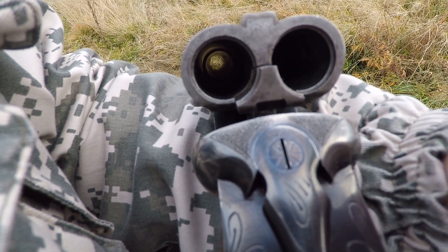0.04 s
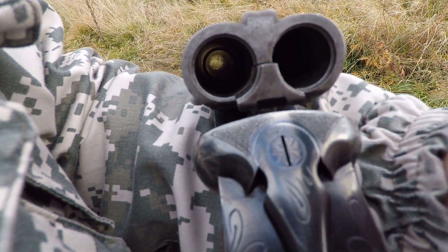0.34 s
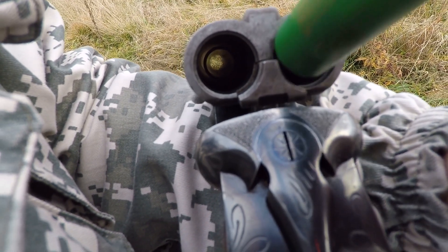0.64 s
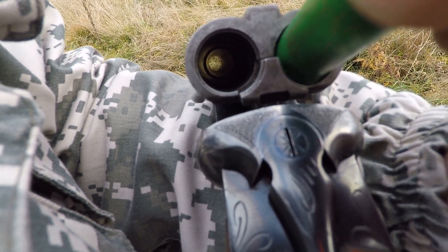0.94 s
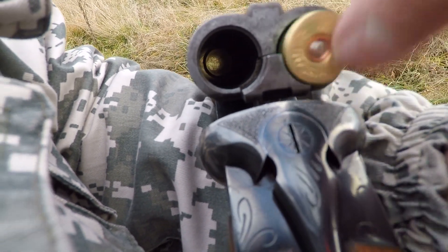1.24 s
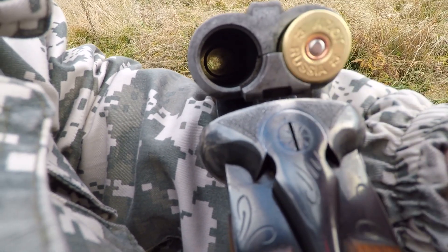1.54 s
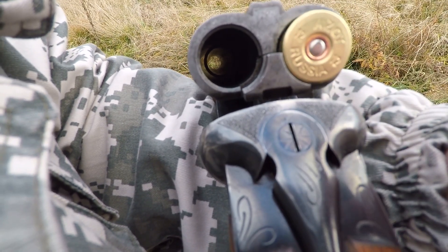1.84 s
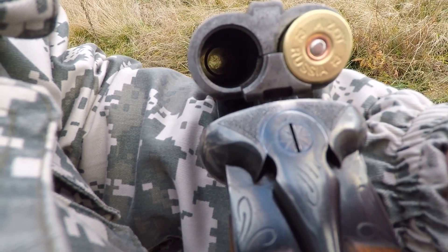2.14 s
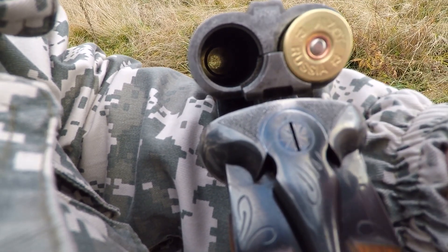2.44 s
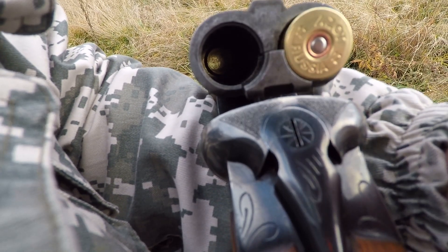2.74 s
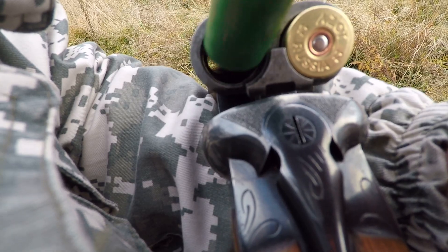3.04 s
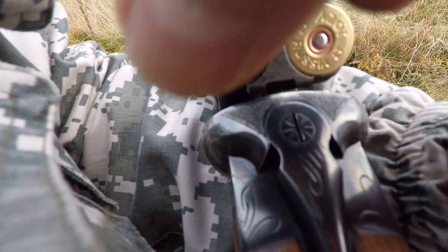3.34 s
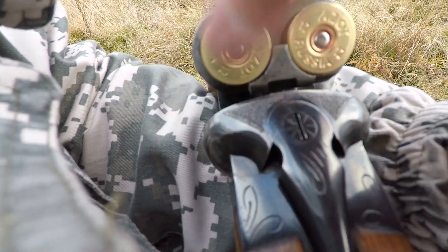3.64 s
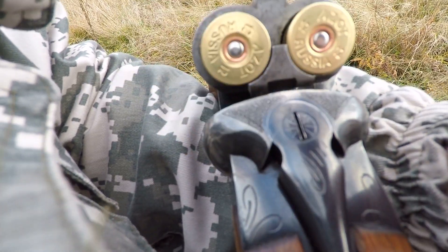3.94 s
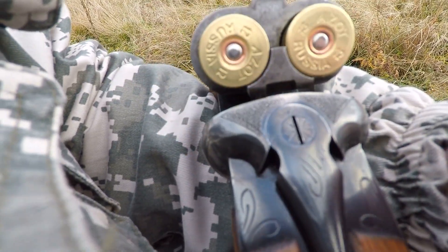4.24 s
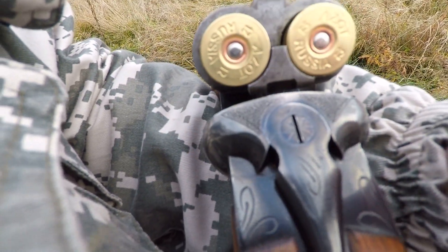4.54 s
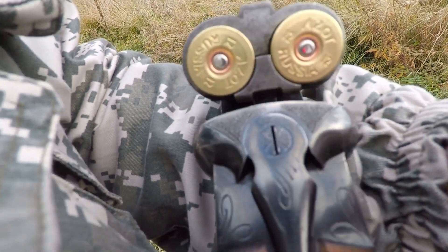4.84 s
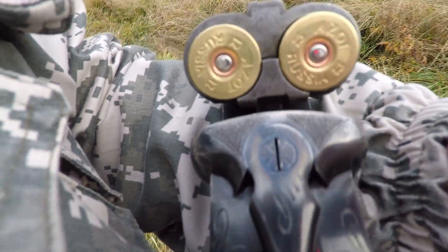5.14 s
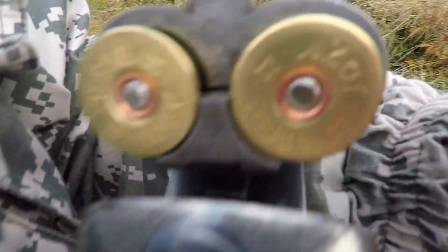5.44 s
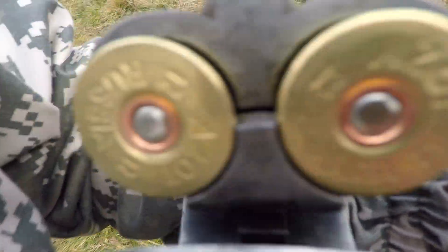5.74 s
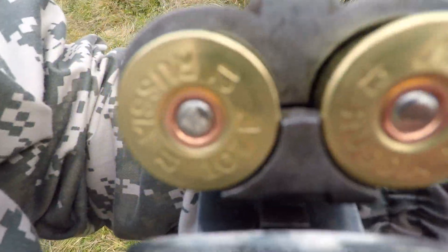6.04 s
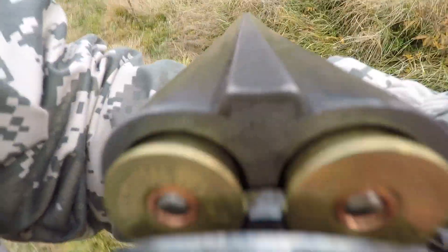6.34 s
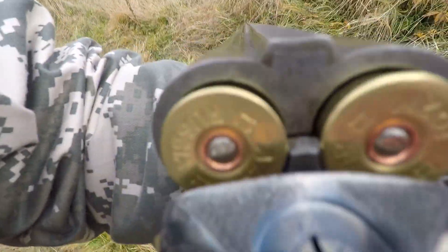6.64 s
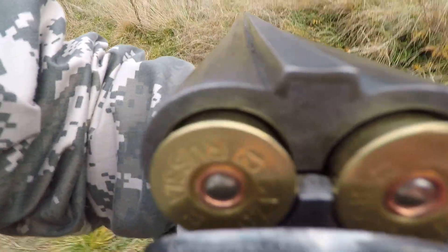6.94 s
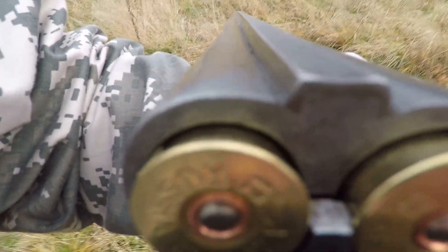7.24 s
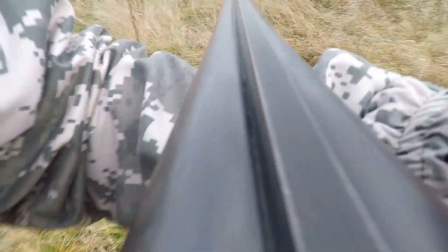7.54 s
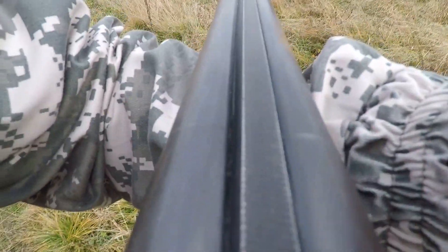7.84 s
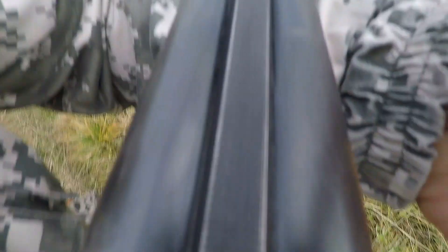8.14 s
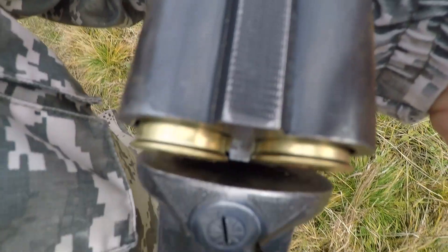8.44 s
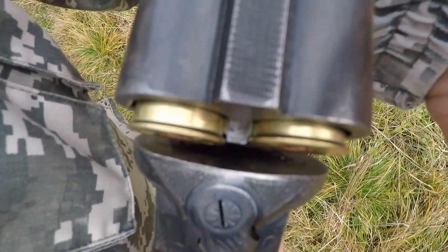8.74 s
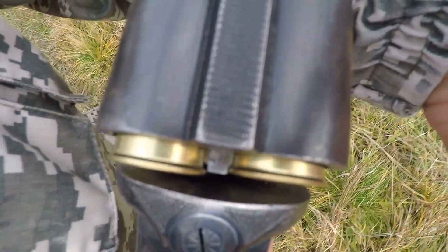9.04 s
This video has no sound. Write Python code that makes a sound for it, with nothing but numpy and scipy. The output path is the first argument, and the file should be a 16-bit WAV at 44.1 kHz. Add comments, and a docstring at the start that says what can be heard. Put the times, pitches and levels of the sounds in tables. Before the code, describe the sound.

Close up, a shotgun is loaded with two sliding shells, each clicking home, then shifted with soft thumps, ticks and cloth rustle.

```python
"""A quiet meadow, where two cartridges slide into a side-by-side shotgun, very close up.
Each plastic hull bumps and scrapes along its chamber until the brass rim snaps home and the barrels
ring. Between the two, the second cartridge is tugged from a rustling pocket. Then the gun shifts on
the lap: sleeves swish, fittings tick, and handling gives dull knocks and low thumps."""
import sys
import numpy as np
from scipy import signal
from scipy.fft import rfft, irfft
from scipy.io import wavfile

SR = 44100
rng = np.random.default_rng(int(sys.argv[2]) if len(sys.argv) > 2 else 0)


def output_pcm(signal):
    """Save a mono or channel-first signal as 16-bit PCM at the path in sys.argv[1].

    Samples are clipped to [-1, 1] before scaling.
    """
    pcm = np.clip(np.atleast_2d(signal).T, -1, 1) * 32767
    wavfile.write(sys.argv[1], SR, np.round(pcm).astype(np.int16))


N = 405719
TIME = np.arange(N) / SR

# The dead thud of a filled hull. Each row: frequency in Hz, relative level in dB.
HULL_THUD = [(50, -6), (130, -2), (280, -4), (420, 1), (750, -6.5), (1100, -16), (2500, -35.5)]


def from_db(db):
    """Decibels to gain."""
    return 10 ** (np.asarray(db) / 20)


def rms_one(x):
    """Scale to unit power."""
    return x / np.sqrt(np.mean(x ** 2) + 1e-20)


def add(track, s, sound):
    """Mix a short sound in at s seconds."""
    start = int(round(s * SR))
    track[start:start + len(sound)] += sound[:N - start]


def response(spectrum, size=4096):
    """Minimum-phase impulse response of an EQ curve; unit energy."""
    hz, db = np.transpose(spectrum)
    grid = np.maximum(np.fft.rfftfreq(size, 1 / SR), 1)
    gain = from_db(np.interp(np.log(grid), np.log(hz), db))
    cepstrum = irfft(np.log(gain))
    cepstrum[1:size // 2] *= 2
    cepstrum[size // 2 + 1:] = 0
    pulse = irfft(np.exp(rfft(cepstrum)))
    return pulse / np.linalg.norm(pulse)


def colour(x, spectrum):
    """Shape a sound with an EQ curve."""
    return signal.oaconvolve(x, response(spectrum))[:N]


def band(x, low_hz, high_hz):
    """Keep one band."""
    edges = [low_hz, min(high_hz, SR / 2 - 1000)]
    return signal.sosfilt(signal.butter(2, edges, "band", fs=SR, output="sos"), x)


def soften(x, hz):
    """A softer contact loses its treble."""
    return signal.sosfilt(signal.butter(2, min(hz, SR / 2 - 1000), fs=SR, output="sos"), x)


def ring(force, hz, t60):
    """One resonance: a unit click sets off a sine that falls 60 dB in t60 seconds."""
    r = np.exp(-np.log(1000) / (t60 * SR))
    w = 2 * np.pi * hz / SR
    return signal.lfilter([0, np.sin(w)], [1, -2 * r * np.cos(w), r * r], force + 1e-18)


def surge(spread_db, per_s):
    """A gain that wanders by chance."""
    knots = rng.standard_normal(2048)
    return from_db(spread_db * np.interp(TIME * per_s, np.arange(len(knots)), knots))


def stroke(middle_s, half_s, db, steepness=2.8):
    """Envelope of one sliding movement: it gathers speed, holds and comes to rest."""
    return from_db(db) / (1 + np.abs((TIME - middle_s) / half_s) ** steepness)


def friction(spread_db):
    """Countless tiny slips of uneven size; rms 1."""
    noise = rng.standard_normal(N)
    grains = np.repeat(rng.standard_normal(N // 32 + 1), 32)[:N]
    return rms_one(noise * from_db(spread_db * grains))


def chatter(decay, size=2048):
    """A dying flurry of tiny contacts that excites all pitches about alike; unit energy."""
    t = TIME[:size]
    spectrum = rfft(rng.standard_normal(size) * np.exp(-t / decay))
    flat = irfft(spectrum / (np.abs(spectrum) + 1e-12))
    flurry = flat / (1 + (t / (np.pi * decay)) ** 2) ** 2
    return flurry / np.linalg.norm(flurry)


def air(level_db=-63):
    """Open air lays a faint, steady bed of noise."""
    # The meadow's tone. Each row: frequency in Hz, relative level in dB.
    air_eq = [(15, -28.5), (25, 2), (160, -16.5), (274, -13.5), (340, -16.5), (567, -18), (614, -21.5),
              (684, -18.5), (782, -21), (2630, -23), (15500, -35.5)]
    return from_db(level_db) * colour(rng.standard_normal(N), air_eq)


def hands(trim_db=2, judder_hz=144):
    """The hands rumble on the gun and once judder along the stock."""
    # The swell of the grip. Each row: time in seconds, relative level in dB.
    grip = [(0.0, -62.5), (0.56, -64), (1.25, -53.5), (1.64, -59.5), (2.56, -65), (3.3, -55), (4.25, -62.5),
            (5.28, -55), (5.84, -62), (6.43, -52), (7.25, -59.5), (7.61, -52), (8.79, -67), (9.2, -58.5)]
    # Its deep rumble. Each row: frequency in Hz, relative level in dB.
    rumble_eq = [(15, -4.5), (35, -0.5), (60, -5), (100, -15), (200, -22), (400, -33), (1000, -56.5)]
    swell = from_db(trim_db + np.interp(TIME, *np.transpose(grip)))
    rumble = swell * colour(rng.standard_normal(N), rumble_eq)
    judder = rms_one(ring(rng.standard_normal(N), judder_hz, t60=0.13))
    return rumble + stroke(middle_s=5.415, half_s=0.035, db=-45.5) * judder


def scrapes(bite_s=0.008, fall_db=-4, coupling_db=-27, thud_db=-3):
    """The ribbed hull bites, hisses in jerks on the chamber wall, thuds and softly drives the barrels."""
    # Bumps that ease into slides. Each row: start and length in seconds, then relative hiss,
    # body and extra bite of the first touch in dB.
    slides = [(.731, 0.021, -61.5, -52, 0), (0.787, 0.042, -54, -50.5, 8), (0.888, 0.02, -51.5, -44, 4),
              (1.182, .05, -65, -55.5, 9), (1.2449, .062, -43, -42, 3), (1.356, .016, -55, -45, 0),
              (2.8732, 0.026, -44, -45.5, 8.5), (3.067, .05, -47, -47.5, -0.5),
              (3.162, 0.045, -51, -51.5, -2.5), (3.226, .02, -48.5, -45.5, 0.5),
              (3.395, 0.019, -61.5, -54, 1), (3.579, 0.058, -52, -54, 4.5),
              (3.598, 0.0091, -44.5, -45, 1.5), (3.644, 0.046, -45.5, -44, -5.5),
              (3.706, 0.021, -42, -45.5, 2.5)]
    # Plastic rubbing on steel. Each row: frequency in Hz, relative level in dB.
    plastic_eq = [(300, -9), (1200, -5.5), (2000, -9.5), (2800, -9), (4000, -3), (4700, -7.5), (7000, 2.5),
                  (8600, -9), (10000, -4.5), (12000, -10.5), (15000, -14)]
    envelope, force = np.zeros((2, N))
    for s, length, hiss_db, body_db, bite_db in slides:
        t = TIME[:int(2 * length * SR)]
        pressure = from_db(fall_db * t / length + bite_db * np.exp(-t / bite_s))
        pressure /= 1 + (t / length) ** 10  # the hull lets go
        add(envelope, s, from_db(hiss_db) * pressure)
        bump = chatter(length / 2 / from_db(bite_db), size=8192)
        add(force, s, from_db(body_db) * np.linalg.norm(pressure) * bump)
    jerks = rms_one(surge(spread_db=4, per_s=240))
    steel = from_db(coupling_db) * barrels(soften(force, hz=800), uneven_db=2.5)
    hiss = colour(envelope * jerks * friction(spread_db=5.5), plastic_eq)
    thud = from_db(thud_db) * colour(force, HULL_THUD)
    return hiss + thud + steel


def barrels(force, uneven_db=3.5):
    """Every mode of the steel answers the same force, a little differently from touch to touch."""
    # Modes of barrels and action. Each row: pitch in Hz, relative level in dB, t60 in seconds.
    modes = [(126, -9.5, 0.3), (197, -9, 0.46), (243.6, -5.5, 0.16), (312, -8, .16), (367, -3, 0.19),
             (457.2, -11.5, 0.26), (495.7, -11, 0.15), (657, -9.5, 0.11), (907, -10, .06),
             (1180, 1.5, 0.062), (1190, -6, 0.1), (1289, -6, 0.092), (1340, -8.5, .1), (1540, -11.5, .08),
             (1980, -3.5, 0.05), (2201, -6, 0.055), (5300, -16, .05), (6000, -17.5, .05), (6760, -18, .05),
             (7252, -18, .05), (7900, -15.5, .05)]
    return sum((-1) ** k * ring(force * from_db(db) * surge(uneven_db, per_s=1.7), hz, t60)
               for k, (hz, db, t60) in enumerate(modes))


def thumps(swings=7.2):
    """The whole gun rocks in the hands, and the grip stops it within a few swings."""
    # Low rocking. Each row: start in seconds, level in dB, pitch in Hz.
    rocks = [(0.745, -34, 44), (0.893, -34, 54.3), (1.126, -40.5, 100), (1.325, -36.5, 62),
             (2.875, -28.5, 83), (3.071, -31, 71.6), (3.17, -38.5, 86), (3.239, -31.5, 41.87),
             (3.56, -35, 74), (3.605, -33, 69), (3.68, -30, 46.3), (4.79, -40.5, 48), (5.197, -37, 93.2),
             (5.41, -41, 36), (6.317, -36, 54.9), (6.37, -41, 42), (6.944, -37.5, 44.6),
             (7.266, -35.5, 54.8), (7.804, -33.5, 41.7), (8.18, -37, 65.1)]
    out, click = np.zeros(N), signal.unit_impulse(SR // 2)
    for s, db, hz in rocks:
        add(out, s, from_db(db) * ring(click, hz, t60=swings / hz))
    return out


def knocks(body_hz=190, body_db=-18, wood_hz=900, wood_db=-15):
    """Handling gives dead knocks, each with a short ring of body and wood at pitches of its own."""
    # The knocks. Each row: start in seconds, pulse peak in dB, treble cutoff in Hz.
    hits = [(0.7878, -37, 700), (.887, -34.5, 700), (2.8744, -22, 700), (3.0658, -32.5, 600),
            (3.196, -33, 899), (4.576, -41, 1397), (5.0165, -31, 903), (5.1532, -29.5, 1600),
            (5.1815, -23.5, 2200), (5.196, -26, 2200), (5.2171, -25.5, 2000), (5.2588, -24, 2220),
            (5.6189, -32, 1800), (6.216, -33.5, 2490), (6.2697, -34.5, 2480), (6.317, -33.5, 2530),
            (6.338, -39, 2000), (6.3917, -38.5, 1980), (6.466, -31.5, 2200), (6.7452, -29, 1996),
            (6.943, -27.5, 1500), (6.958, -26, 2220), (6.9884, -31, 2200), (7.1989, -31, 3470),
            (7.264, -24.5, 2200), (7.457, -39, 1200), (8.179, -41, 450)]
    # A knock's tone before softening. Each row: frequency in Hz, relative level in dB.
    knock_eq = [(30, -32), (100, 13.5), (200, 6), (400, 9), (800, 4), (1400, 3.5), (2100, -0.5),
                (2900, -11.5), (6000, -1.5), (15000, -2)]
    out, click = np.zeros(N), signal.unit_impulse(SR // 2)
    knock = response(knock_eq, size=len(click))
    detunes = 2 ** rng.uniform(-0.47, 0.34, (len(hits), 2))
    for (s, db, cutoff_hz), (body_detune, wood_detune) in zip(hits, detunes):
        pulse = soften(knock, cutoff_hz)
        body = from_db(body_db) * ring(click, body_hz * body_detune, t60=0.098)
        wood = from_db(wood_db) * ring(click, wood_hz * wood_detune, t60=0.025)
        add(out, s, from_db(db) * (body + wood - pulse / np.abs(pulse).max()))
    return out


def cloth():
    """Threads catch and slip in uneven surges; rms 1."""
    return rms_one(friction(spread_db=2) * surge(spread_db=2.5, per_s=63))


def sleeves(trim_db=-1, drag_hz=(550, 3700)):
    """Sleeves swish over cloth and rub on the gun; once a stiff fold drags across it."""
    # Arm movements. Each row: middle and half length in seconds, relative swish and rub in dB.
    moves = [(1.19, 0.084, -66.5, -62), (4.968, 0.21, -68, -56), (5.305, .13, -63.5, -58),
             (5.522, 0.11, -63, -64), (6.318, 0.066, -69.5, -65), (6.497, 0.063, -62, -61),
             (7.0, 0.3, -66.5, -65.5), (7.5, 0.071, -60.5, -59.5), (7.63, 0.041, -56, -55),
             (7.773, 0.1, -65.5, -63), (8.2, 0.12, -67, -72), (9.15, 0.096, -63.5, -64.5)]
    # Cloth on cloth, then cloth on the gun. Each row: frequency in Hz, relative level in dB.
    swish_eq = [(800, -15), (2200, -3.5), (4500, 3.5), (7000, -4.5), (10000, -13.5), (15000, -17)]
    rub_eq = [(100, 1.5), (250, -5.5), (600, -2), (1500, -5), (2300, -12.5), (4000, -19.5), (9000, -27)]
    swish = sum(stroke(s, half, db + trim_db) for s, half, db, _ in moves)
    rub = sum(stroke(s, half, db + trim_db) for s, half, _, db in moves)
    stiff_fold = rms_one(band(band(cloth(), *drag_hz), *drag_hz))
    drag = stroke(middle_s=6.312, half_s=0.012, db=-47) * stiff_fold
    return swish * colour(cloth(), swish_eq) + rub * colour(cloth(), rub_eq) + drag


def crack(decay, pitch_hz, q=4.3, broad_db=-7, size=2048):
    """One hard contact: a dense ring around its main pitch that dies within milliseconds."""
    # Brass on steel. Each row: frequency in Hz, relative level in dB.
    brass_eq = [(100, -8), (400, -2), (800, -6), (1600, -5.5), (2200, -2), (3700, -2), (4600, -3.5),
                (5600, -2.5), (6500, -7), (7600, -2.5), (10000, -9), (11500, -15.5), (15000, -21.5)]
    broad = signal.fftconvolve(chatter(decay), response(brass_eq))[:size]
    pitched = signal.lfilter(*signal.iirpeak(pitch_hz, q, fs=SR), broad)
    burst = from_db(broad_db) * broad + pitched
    return burst * np.sqrt(decay * SR / 2) / np.linalg.norm(burst)  # starts near unit rms


def ticks(decay_s=0.0007):
    """Small metal parts touch, too light to move the barrels or to sound far below their pitch."""
    # Cartridges and fittings. Each row: start in seconds, relative level in dB, main pitch in Hz.
    touches = [(1.184, -38, 2000), (1.251, -33, 1900), (1.38, -46.5, 13000), (1.429, -46.5, 5030),
               (1.522, -51, 6300), (1.7965, -44.5, 9300), (2.4529, -42.5, 11200), (2.554, -36.5, 10300),
               (2.607, -25.5, 9500), (3.0685, -45, 4000), (3.196, -33, 2120), (3.238, -36.5, 3900),
               (3.6, -36, 2080), (5.891, -38.5, 1697), (6.606, -42.5, 3230), (6.9422, -37.5, 4020),
               (6.948, -40.5, 2500), (6.968, -37, 4000), (7.254, -34, 2600), (7.458, -43, 2500),
               (7.6314, -33.5, 4850), (7.64, -36.5, 3530), (7.8065, -43, 3460), (8.285, -47.5, 6970),
               (9.137, -43, 4000)]
    out = np.zeros(N)
    for s, db, pitch_hz in touches:
        add(out, s, from_db(db) * band(crack(decay_s, pitch_hz), pitch_hz / 2, 2 * pitch_hz))
    return out


def seating(push_db=28.5, tail_db=-28, hollow_db=45.5, thud_db=33):
    """The brass rim snaps home: the steel rings, the chamber answers hollowly and the hull thuds."""
    # Rim strikes and bounces. Each row: start in seconds, level in dB, decay in seconds, pitch in Hz.
    strikes = [(1.3146, -9.5, 0.00089, 2200), (1.3162, -13.5, 0.0026, 2070), (1.3223, -5.5, 0.00096, 7800),
               (1.3228, -14.5, 0.002, 9600), (1.3590, -29, .00088, 4870), (3.6750, -5, .00073, 5560),
               (3.6767, -22, .006, 1130), (3.68, -10.5, 0.0007, 3676), (3.693, -21, 0.0017, 7360),
               (3.6955, -16.5, 0.0012, 7000), (3.6968, -11, 0.0019, 2280), (3.7032, -5, .00055, 7600),
               (3.7054, -4, 0.00072, 3994)]
    snaps, force, chamber = np.zeros((3, N))
    for s, db, decay, pitch_hz in strikes:
        add(snaps, s, from_db(db) * crack(decay, pitch_hz))
        add(snaps, s, from_db(db + tail_db) * crack(decay=0.008, pitch_hz=7300))  # the action rings on
        push = from_db(db + push_db) * decay  # strength times duration
        add(force, s, np.array([push]))
        add(chamber, s, push * from_db(hollow_db) * chatter(decay=0.0089))
    hollow = band(chamber, low_hz=1050, high_hz=1330)
    thud = from_db(thud_db) * band(colour(force, HULL_THUD), low_hz=146, high_hz=470)
    return snaps + barrels(force) + hollow + thud


def bore_echo(start_s=1.3229, peak_db=-1.4, trips_per_s=226.3, loss_db=-7, band_hz=(2900, 4350)):
    """The first cartridge's snap runs up and down the open bore, weaker on each return."""
    pulse = band(band(signal.unit_impulse(SR // 100), *band_hz), *band_hz)
    pulse /= np.abs(pulse).max()
    out = np.zeros(N)
    for trip in range(10):
        add(out, start_s + trip / trips_per_s, from_db(peak_db + trip * loss_db) * pulse)
    return out


def crackle(per_s=70, spread_db=4):
    """Single fibres let go at random moments; rms 1."""
    releases = rng.random(N) < per_s / SR
    sizes = from_db(spread_db * np.clip(rng.standard_normal(N), -2, 2))
    return rms_one(releases * sizes)


def pocket():
    """Tugs work a cartridge free: the pocket crinkles, its weave zings and its heavy cloth is pulled."""
    # The tugs. Each row: middle and half length in seconds, relative rustle and zing in dB.
    tugs = [(1.874, 0.058, -65.5, -80), (2.014, 0.06, -66, -72), (2.18, 0.061, -69.5, -62.5),
            (2.327, 0.026, -62.5, -68), (2.658, .14, -69, -72)]
    # Crinkling fabric. Each row: frequency in Hz, relative level in dB.
    pocket_eq = [(880, -46.5), (1500, -15), (1670, -14.5), (2060, -19.5), (2360, -7.5), (4250, -4),
                 (6810, 1), (8410, -7.5), (11800, -7), (15000, -15.5)]
    rustle = sum(stroke(s, half, db) for s, half, db, _ in tugs)
    zing = sum(stroke(s, half, db) for s, half, _, db in tugs)
    pull = stroke(middle_s=1.95, half_s=0.14, db=-67)
    crinkle = colour(cloth() + crackle(), pocket_eq)
    weave = rms_one(band(cloth(), low_hz=6640, high_hz=8255))
    heavy_cloth = rms_one(band(cloth(), low_hz=200, high_hz=310))
    return rustle * crinkle + zing * weave + pull * heavy_cloth


def scene():
    """Open air, loading and handling, mixed in mono."""
    bed = air()
    loading = seating() + bore_echo() + scrapes()
    handling = ticks() + knocks() + thumps() + sleeves() + pocket() + hands()
    return (bed + loading + handling)[None]


def record(dry, ceiling=0.88, cutoff_hz=15500):
    """Clip the peaks just under full scale, then cut the top steeply."""
    lowpass = signal.ellip(10, 0.1, 70, cutoff_hz, fs=SR, output="sos")
    return signal.sosfilt(lowpass, np.clip(dry, -ceiling, ceiling))


dry = scene()
out = record(dry)
output_pcm(out)
```